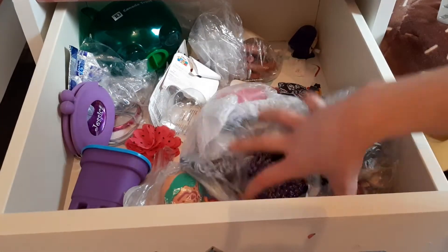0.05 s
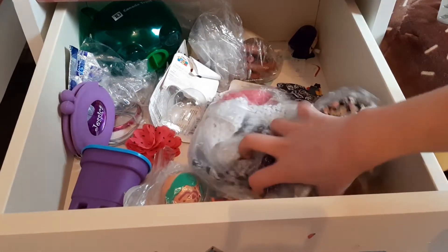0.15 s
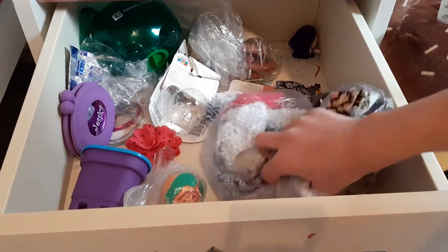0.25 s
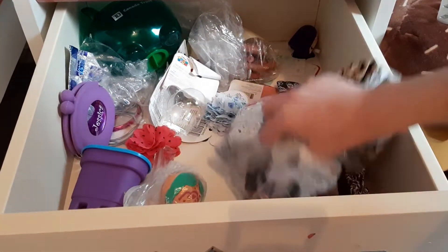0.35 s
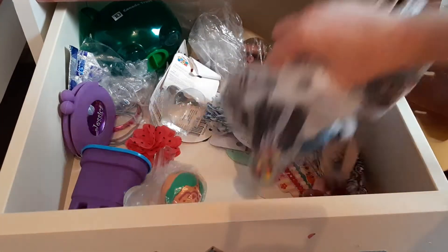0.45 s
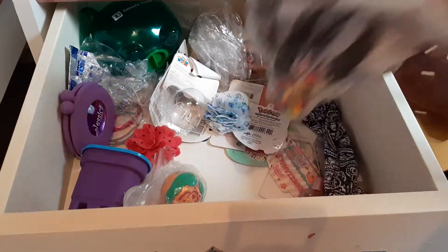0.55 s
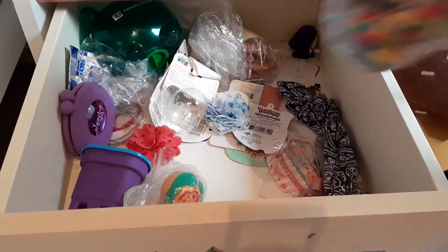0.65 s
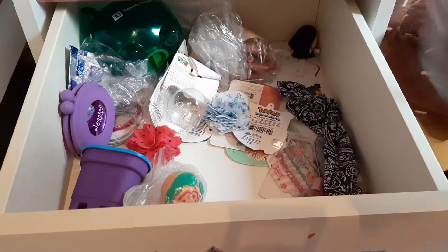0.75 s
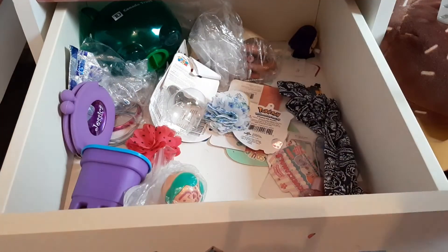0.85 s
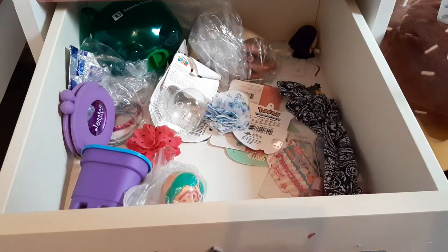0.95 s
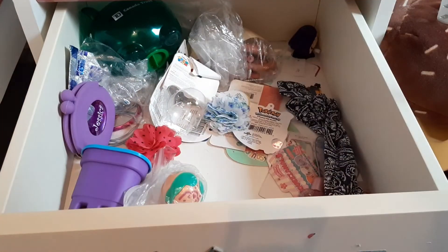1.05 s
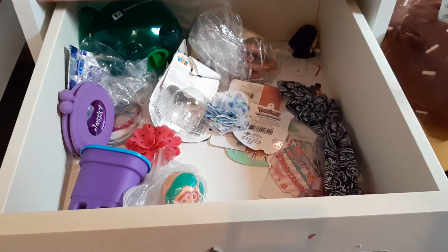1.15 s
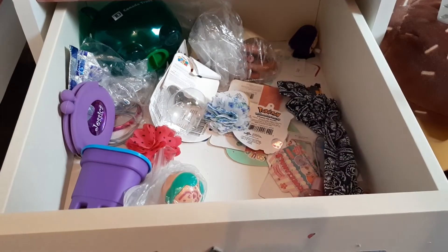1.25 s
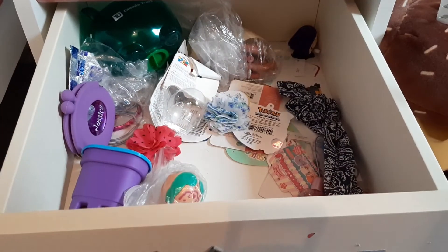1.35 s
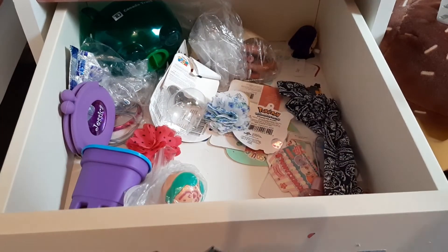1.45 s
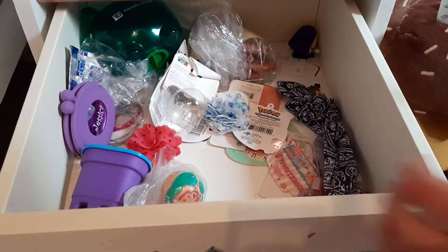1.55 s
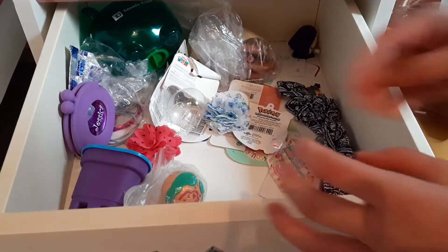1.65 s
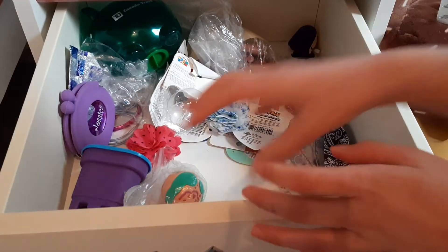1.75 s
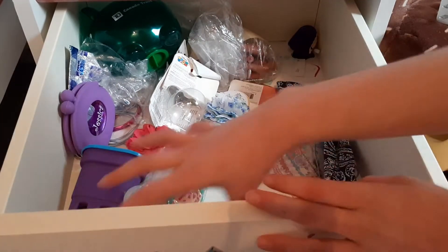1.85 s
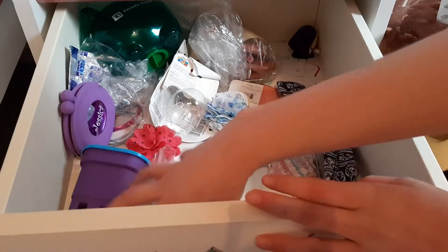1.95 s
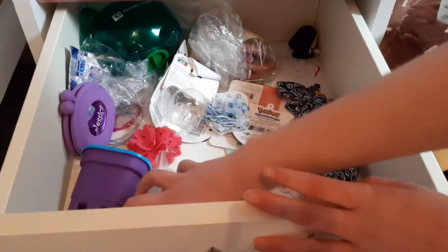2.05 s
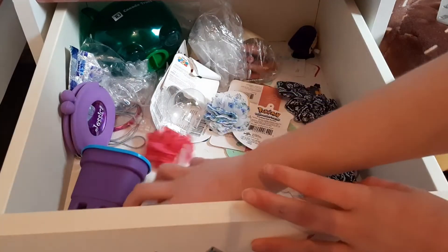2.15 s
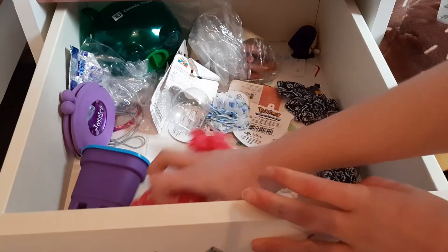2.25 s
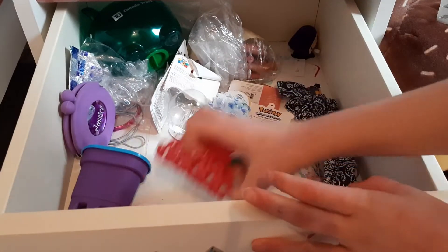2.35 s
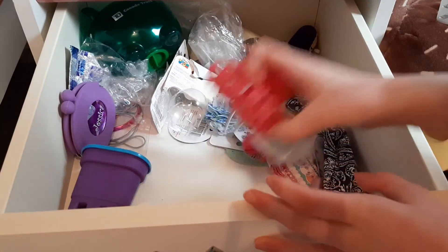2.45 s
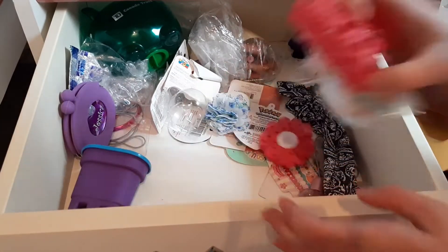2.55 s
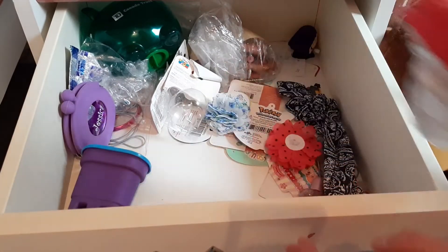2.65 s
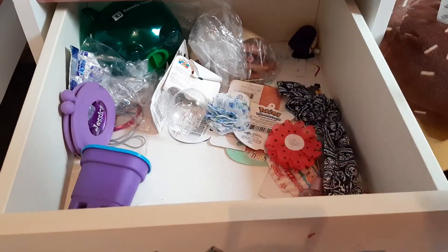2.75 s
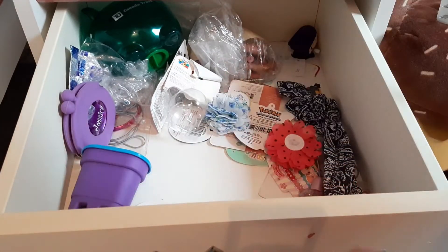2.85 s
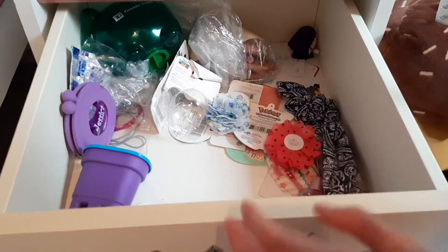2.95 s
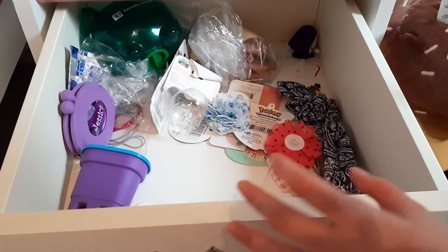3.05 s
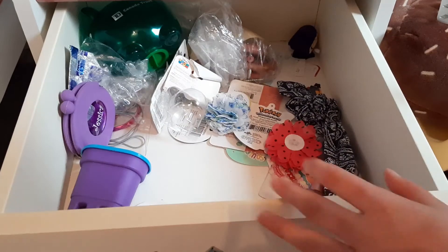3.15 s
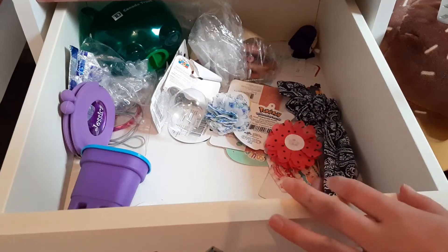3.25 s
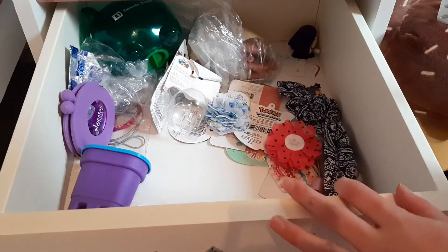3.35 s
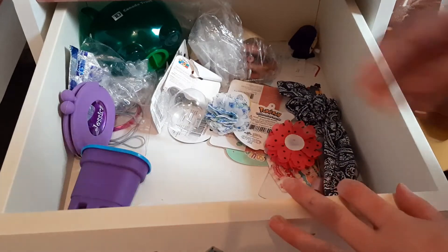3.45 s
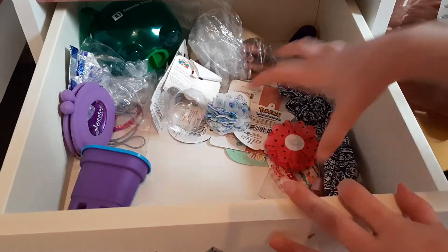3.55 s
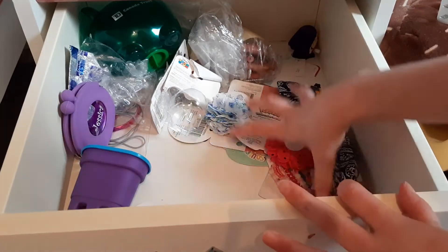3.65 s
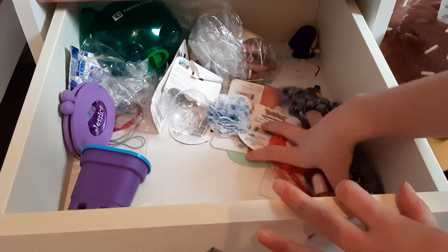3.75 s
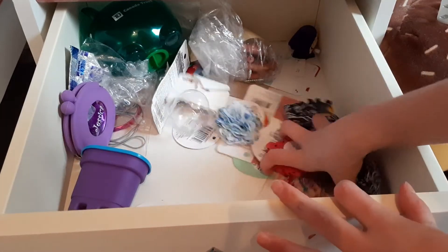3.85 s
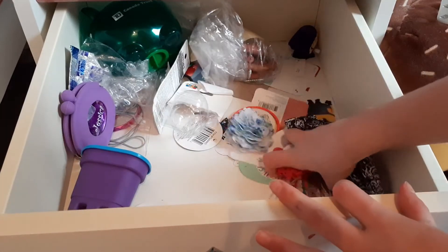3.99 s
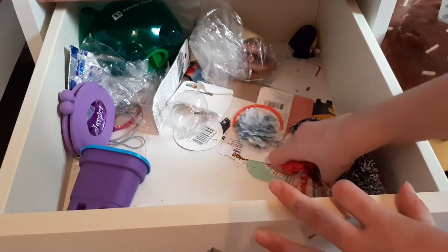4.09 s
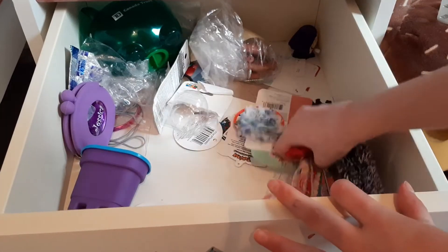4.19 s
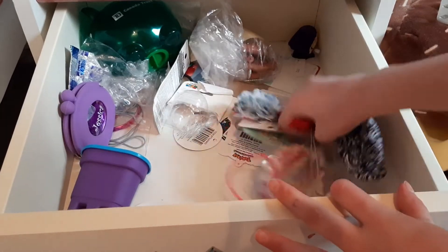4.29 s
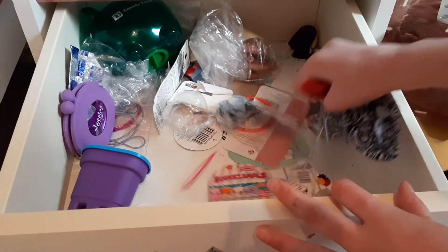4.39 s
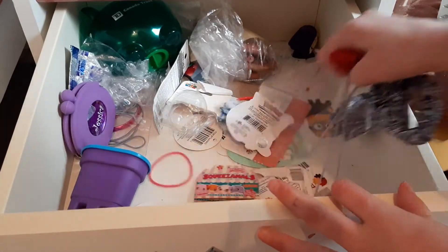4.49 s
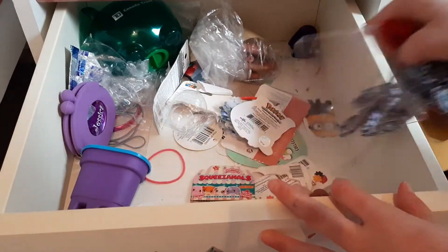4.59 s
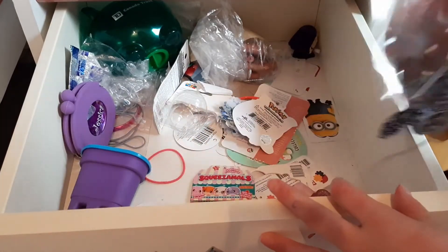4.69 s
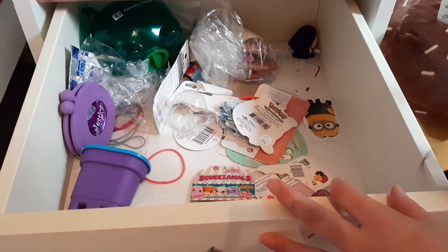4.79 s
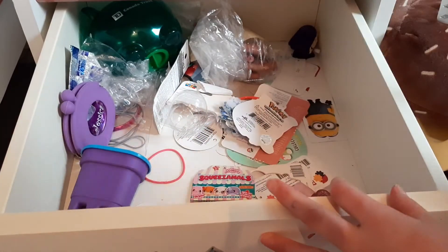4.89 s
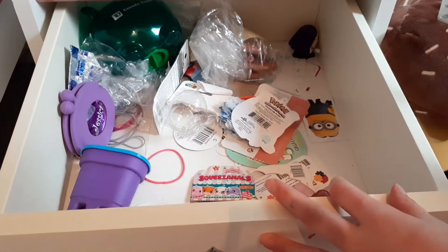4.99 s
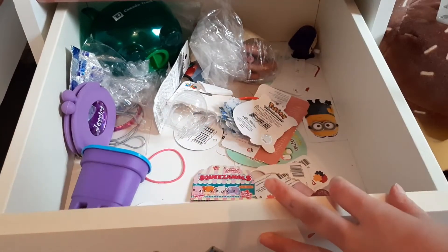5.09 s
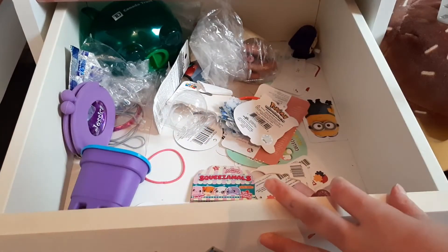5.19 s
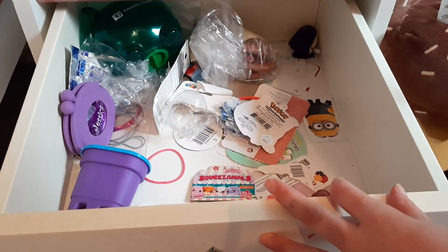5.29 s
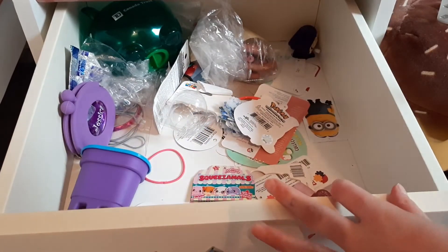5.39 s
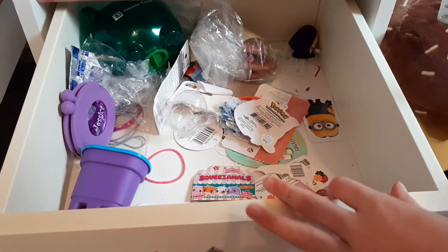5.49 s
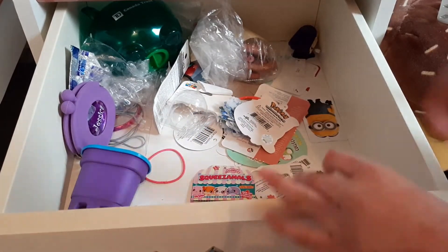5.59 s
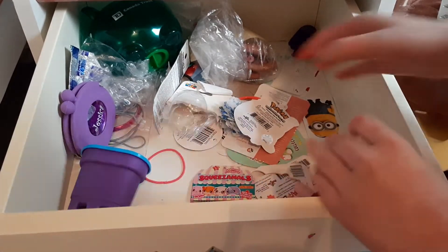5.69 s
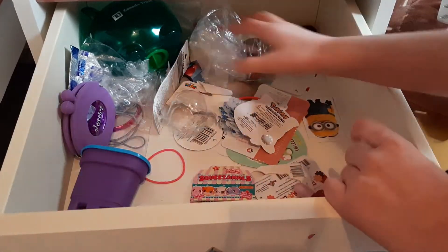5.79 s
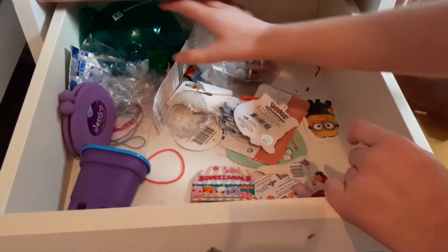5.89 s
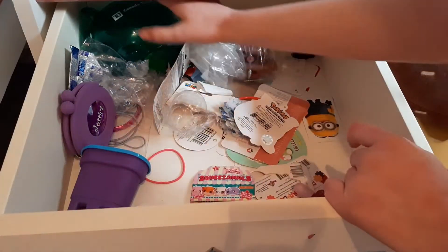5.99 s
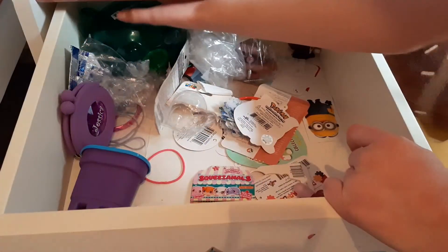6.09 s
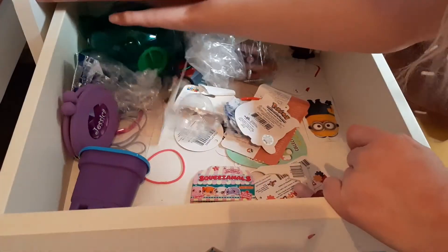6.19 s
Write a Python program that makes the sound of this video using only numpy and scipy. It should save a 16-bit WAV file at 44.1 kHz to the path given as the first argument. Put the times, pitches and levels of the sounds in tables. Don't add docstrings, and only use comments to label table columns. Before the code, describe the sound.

Hands rummage in a wooden drawer, plastic bags crinkling, small hard items clicking and knocking in bursts, then the drawer judders on its runners.

```python
import sys
import numpy as np
from scipy import signal
from scipy.fft import rfft, irfft
from scipy.io import wavfile
from scipy.ndimage import uniform_filter1d, map_coordinates

SR = 44100
rng = np.random.default_rng(int(sys.argv[2]) if len(sys.argv) > 2 else 0)


def to_linear_factor(level_db):
    exponent = np.asarray(level_db, float) / 20
    return 10 ** exponent


def wav_record(signal):
    frames = np.transpose(np.atleast_2d(signal))
    bounded = np.clip(frames, -1, 1)
    quanta = np.round(bounded * 32767).astype(np.int16)
    wavfile.write(sys.argv[1], SR, quanta)


N = 274743

# f/Hz, density/dB
HUSH = [(15, -34.5), (25, -7.5), (80, 3.5), (560, -8), (1840, -17.5), (2050, -13), (3250, -18.5),
        (5140, -7), (7710, -20.5), (8590, -28), (11900, -6.5), (16000, -7)]
HUSH_DB = -76
# f/Hz, share/0-1
LIKENESS = [(30, .8), (80, 0.8), (250, 0.9), (500, .55), (1200, 0.5), (3000, 0)]
GRABS_S = (0.064, 1.998, 3.087, 3.712, 4.702, 5.334)
GRAB_RISE_S = 0.012
# t/s, peak/dB, 20 dB rise/s, 20 dB fall/s
SQUEEZES = [(0.094, -34, .031, .35), (0.198, -32, .08, .1), (0.42, -34, .35, .13), (0.748, -46, .6, .1),
            (0.86, -44, .11, .3), (0.97, -39.5, .2, .13), (1.39, -28, .185, .1), (1.556, -42.5, .3, .33),
            (2.14, -47.5, .25, .3), (2.206, -37.5, .03, .15), (2.436, -52.5, .1, .11),
            (2.68, -63, .02, .22), (3.06, -71, .35, .2), (3.1, -52, .1, .2), (3.168, -37.5, .1, .11),
            (3.33, -67, .1, .22), (3.728, -49.5, .025, .4), (3.85, -48, .12, .3), (3.942, -44, .15, .14),
            (4.054, -42, .04, .07), (4.172, -48, .01, .4), (4.8, -64, .3, .45), (4.413, -34.5, .055, .037),
            (4.489, -37, .05, .095), (4.6, -59, .05, .2), (5.325, -58, .2, .1), (5.345, -37, .01, .14),
            (5.485, -41.5, .04, .6), (5.834, -46.5, .25, .45), (6.23, -43.5, .27, .3)]
# t/s, left minus right/dB, thick film level/dB
BAG_PLACE = [(0.0, -4.5, -15), (0.5, -2.0, -12), (0.87, -11.5, -26), (1.32, -4, -19), (1.86, -9, -9),
             (2.08, -1.5, 1.5), (2.53, -3.5, -2.5), (2.6, -17, -11), (3.07, -6, -1.5), (3.3, -10, -14),
             (3.66, -4, 1), (4.89, -3.5, 0), (5.15, -7, -13), (6.23, -2.5, -0.5)]
# f/Hz, density/dB
FILM = [(300, -37), (800, -12), (1200, -5.5), (2000, -3.5), (3500, -3), (6000, -2), (12000, 0.5),
        (16000, -2)]
# t/s, peak/dB, 20 dB rise/s, 20 dB fall/s, hard edge level/dB
SLIDES = [(0.11, -49, .04, .3, 8), (0.194, -43, .06, .05, -4), (0.46, -51, .5, .053, 6),
          (0.98, -61, .2, .06, -1), (1.39, -36.5, .065, .055, -11), (1.48, -63, .05, .42, 10),
          (1.868, -68, .09, .4, -8), (2.002, -48, .01, .3, -10), (2.058, -41, .1, .25, 0),
          (2.27, -48, .3, .18, 8), (2.42, -46, .013, .1, 9), (2.452, -45, .05, .05, 4),
          (3.164, -43.5, .085, .113, 3), (3.05, -70, .1, .1, -2), (3.8, -37, .07, .33, 2),
          (4.235, -40, .075, .05, 8), (4.33, -28, .012, .075, 5), (4.306, -40, .01, .1, 6),
          (4.37, -37, .05, .26, 3), (4.548, -39, .3, .13, 0), (4.705, -37, .01, .083, -3),
          (4.822, -33, .03, .135, -7), (5.31, -67, .11, .1, 0), (5.345, -54, .03, .8, 5),
          (5.6, -54, .1, .12, 0), (5.82, -57, .15, .15, 3), (4.95, -49, .15, .075, -3),
          (4.44, -42, .1, .1, 5), (6.022, -50, .02, .4, 3)]
# f/Hz, width/Hz, level/dB
PANEL = [(156, 47, -13), (257, 94, -7.5), (335, 50, -1), (415, 55, -4.5), (560, 76, -5), (790, 230, -6.5)]
# f/Hz, width/Hz, level/dB
EDGE = [(1150, 150, -2.5), (1530, 200, 3), (2060, 200, 4), (2500, 200, -4.5), (3600, 1500, -6)]
# t/s, peak/dB, 20 dB rise/s
LEANS = [(0.14, -71, .12), (0.24, -61, .08), (0.81, -60, .07), (1.4, -43, .06), (1.8, -76, .35),
         (2.03, -63, .12), (2.22, -57, .12), (2.45, -66, .08), (3.23, -65.5, .1), (3.76, -48, .07),
         (3.94, -51, .07), (4.08, -50, .05), (4.45, -53, .05), (4.62, -57, .25), (4.87, -60.5, .18),
         (5.36, -71, .17), (5.65, -57, .06), (5.89, -53, .075), (6.21, -46, .13)]
LEAN_FALL_PER_RISE = 1.15
# t/s, peak/dB, f/Hz, t60/s
BUMPS = [(0.187, -29.5, 328, 0.083), (1.867, -43, 262, 0.061), (1.916, -51.5, 594, 0.094),
         (2.0, -35.5, 570, 0.074), (2.029, -33.5, 374, 0.1), (2.045, -26.5, 362, 0.09),
         (2.087, -28.5, 390, 0.077), (2.103, -30, 400, .07), (2.129, -34, 290, 0.07),
         (2.176, -32, 330, 0.07), (2.19, -33, 340, .07), (2.224, -28.5, 351, 0.06), (2.268, -40, 300, .07),
         (2.298, -38, 350, .06), (2.327, -43, 320, 0.06), (2.343, -43, 350, .06), (2.362, -44, 380, .08),
         (2.439, -46, 574, 0.13), (3.732, -37, 149, 0.12), (3.745, -31, 337, 0.1), (3.787, -32, 370, .08),
         (3.818, -31, 400, .06), (3.849, -30, 580, 0.11), (3.915, -26, 390, 0.15),
         (4.057, -28.5, 362, 0.13), (4.325, -15, 369.5, 0.1), (4.343, -26, 480, .07), (4.41, -27, 350, .07),
         (4.465, -27, 350, .06), (4.483, -24, 334, 0.054), (4.512, -22, 409, 0.096),
         (4.554, -18, 366, 0.069), (4.635, -35.5, 285, 0.12), (4.705, -14.5, 317, 0.064),
         (4.817, -17, 335, 0.12), (5.873, -39.5, 149, 0.065), (5.873, -44, 300, .06),
         (6.024, -45, 600, .06), (6.078, -43, 740, .08), (6.024, -30.5, 283, 0.052),
         (6.054, -36.5, 275, 0.081), (6.103, -36.5, 245, 0.033), (6.128, -32, 393, 0.1)]
# t/s, peak/dB, f/Hz, t60/s
TAPS = [(0.188, -26.5, 2080, 0.052), (2.0004, -51, 912, 0.039), (2.0298, -33.5, 1210, 0.042),
        (2.0417, -27.5, 1510, 0.099), (2.2054, -31.5, 946, 0.065), (2.378, -50, 1760, 0.05),
        (2.4182, -24, 1900, 0.021), (2.441, -29, 1485, 0.046), (3.0879, -39.5, 2050, 0.059),
        (3.766, -18.5, 2210, 0.031), (3.7846, -26, 1890, 0.035), (3.819, -29, 1900, 0.05),
        (3.8686, -31, 1920, 0.035), (3.9135, -23, 2040, 0.045), (3.9335, -21.5, 2520, 0.03),
        (3.9527, -24, 2140, 0.032), (4.06, -28.5, 1135, 0.078), (4.1635, -38.5, 1510, 0.05),
        (4.2337, -30, 1530, 0.037), (4.3035, -25, 2035, 0.067), (4.3263, -14.5, 2070, 0.045),
        (4.3534, -25.5, 2030, 0.058), (4.3828, -26, 1496, 0.041), (4.4697, -24, 2050, 0.05),
        (4.5073, -20.5, 1290, 0.019), (4.5544, -25, 1123, 0.059), (4.7039, -26, 1170, 0.096),
        (4.8185, -19.5, 1150, 0.045), (5.3368, -31, 2190, 0.049)]
# t/s,
# peak/dB, f/Hz, t60/s
RINGS = [(2.18, -38, 1750, .04), (2.245, -38, 1150, .04), (2.4182, -27, 2650, .025),
         (2.4182, -27, 1550, .03), (2.441, -32, 2050, .04), (2.677, -60, 3520, .05),
         (2.677, -60, 4150, .05), (2.745, -64, 4150, .12), (2.75, -67, 3500, .1), (2.395, -45, 3600, .03),
         (5.143, -66, 4800, .03), (3.7235, -38, 4880, .02), (3.7335, -33, 3960, .025),
         (3.7655, -21, 1500, .05), (3.7846, -30, 2650, .03), (3.9145, -19, 1150, .05),
         (3.9135, -28, 3150, .025), (3.9335, -26, 3500, .025), (3.9335, -28, 5050, .025),
         (3.9335, -27, 2100, .05), (4.304, -28, 3500, .025), (4.304, -29, 1400, .05),
         (4.328, -19, 1520, .05), (4.3263, -22, 1150, .05), (4.3534, -27, 1500, .04),
         (4.4067, -28, 1330, .04), (4.422, -31, 2000, .05), (4.444, -31, 1500, .03),
         (4.5073, -27, 1900, .025), (4.538, -34, 3500, .025)]
RING_S = 0.3
PORTS_HZ = 1770
# t/s, peak/dB
SQUEAKS = [
    (0.5746, -52.5),
    (0.5894, -49.5),
    (2.6773, -58),
    (2.7447, -68.5),
    (3.0874, -53),
    (5.1422, -76),
]
# f/Hz, level/dB, t60/s
WRAPPER = [(2060, 3, 0.05), (2840, -13, .05), (3500, -14, 0.066), (4000, -10, 0.04), (5100, -13, 0.057),
           (7060, -10, 0.034)]
# t/s, peak/dB, dull share/dB
SNAPS = [(2.0014, -39.5, 3), (2.0393, -24.5, -13), (2.0802, -25, -35), (2.1754, -32.5, 3.5),
         (2.205, -28, -8), (2.2129, -18.5, -12.5), (2.395, -33.5, -4), (2.4368, -32.5, -0.5),
         (2.678, -45, -4.5), (2.7423, -57, -4), (2.8556, -56, -3), (3.064, -46, -8), (3.0888, -27.5, -3.5),
         (3.141, -26, -18), (3.3997, -55, -15.5), (3.4326, -53.5, -6.5), (3.715, -38, -10.5),
         (3.7323, -21.5, -13.5), (4.4054, -18, -17.5), (4.1634, -24, -12), (5.1138, -54, 2),
         (5.219, -48, -30), (5.3363, -10, -34), (5.4781, -15.5, -8), (5.6762, -28, -20), (5.8287, -31, -17),
         (5.98, -29, -15), (6.111, -29, -11), (6.1913, -31, -7), (0.831, -36, -5), (3.7235, -32, 0),
         (4.2925, -30, -3), (4.464, -26, -3), (4.647, -36, -12), (4.866, -36, -8), (5.0091, -48, -3)]
# start/s, end/s
WRAPPED_S = (3.75, 4.52)
WRAP_DB, WRAP_DULL_DB = -0.3, -11
BOUNCE_DB, BOUNCE_DULL_DB = -15, 0
# t/s, peak/dB
BOUNCES = [
    (4.714, -22),
    (4.7565, -22),
    (4.789, -29),
    (4.819, -30.5),
    (4.861, -26),
    (4.887, -31),
    (4.907, -33),
    (4.934, -36),
    (4.964, -39),
    (5.009, -49),
]
# f/Hz, level/dB, t60/s
HOLLOW = [(327, -1, 0.1), (575, -5, 0.15), (745, -5, .1), (908, 1, 0.082), (1134, 1.5, 0.1),
          (1290, -4, 0.07), (1414, 1, 0.06), (1495, -9.5, .1), (1817, -9, .06), (2040, -12, .05),
          (2810, -6, 0.016), (3750, -18, .03), (5000, -16, .02)]
# t/s, level/dB, jerk rate/Hz
NUDGE = [
    (6.13, -35, 153),
    (6.183, -26, 152.5),
    (6.23, -30, 150.5),
]
# f/Hz, width/Hz, level/dB
FRAME = [(150, 51, 5), (290, 120, -6), (450, 80, -1), (577, 73, -12), (830, 66, -13), (1260, 60, -18),
         (1480, 80, -24), (2040, 300, -14), (3200, 1200, -24)]
ROOM_T60_S, ROOM_DB = 0.18, -5
LEFT_LATE_SAMPLES = 5
# f/Hz, gain/dB
MIC = [(7000, 1.04), (8250, 0.4), (8500, -7.5), (8950, -5), (9300, -4.5), (10800, -0.5), (15650, 4),
       (15900, -35), (18000, -45)]


def curve(table):
    s, *columns = np.transpose(table)
    s = np.maximum.accumulate(s)
    return [np.interp(np.arange(N) / SR, s, c) for c in columns]


def unit(x):
    return x / np.sqrt(np.mean(x ** 2))


def on_log(points):
    hz, value = np.transpose(points)
    return np.interp(np.log(np.fft.rfftfreq(N, 1 / SR) + 1), np.log(hz), value)


def colour(x, points):
    return unit(irfft(rfft(x) * to_linear_factor(on_log(points)), N))


def band(x, lo_hz, hi_hz):
    return signal.sosfilt(signal.butter(2, [lo_hz, hi_hz], "band", fs=SR, output="sos"), x)


def resonate(x, peaks):
    total = 0
    for k, (hz, width_hz, db) in enumerate(peaks):
        b, a = signal.iirpeak(hz, hz / width_hz, SR)
        total = total + (-1) ** k * to_linear_factor(db) * signal.lfilter(b, a, x)
    return unit(total)


def ports(x):
    like = np.clip(on_log(LIKENESS), 0, 1)
    a, b = rfft(x)
    mid, side = a * np.sqrt(1 + like), b * np.sqrt(1 - like)
    return irfft(np.array([mid + side, mid - side]) / 2, N)


def panned(db, pan_db):
    return to_linear_factor(db + np.array([[0.5], [-0.5]]) * pan_db)


def add(out, s, x):
    i = int(s * SR)
    out[:, i:i + x.shape[1]] += x[:, :N - i]


def hush():
    noise = ports(rng.standard_normal((2, N)))
    return to_linear_factor(HUSH_DB) * colour(noise, HUSH) * panned(0.33, -9.0)


def clicks(per_s, scatter_db, t60_s):
    when, size = rng.random(N), rng.exponential(1, N)
    power = (when < per_s / SR) * to_linear_factor(2 * scatter_db * np.minimum(size, 4))
    power = signal.lfilter([1], [1, -1000 ** (-2 / (t60_s * SR))], power)
    return np.sqrt(power) * rng.standard_normal((2, N))


def swells(s, db, rise_s, fall_s):
    t, grabs = np.arange(0, N + 16, 16) / SR, np.array(GRABS_S)
    late = t - s[:, None]
    grab = grabs[np.searchsorted(grabs, s) - 1, None]
    slope = np.where(late < 0, late / rise_s[:, None], -late / fall_s[:, None])
    slope = slope + np.minimum(t - grab, 0) / GRAB_RISE_S
    power = np.sum(10 ** (db[:, None] / 10 + 2 * slope), axis=0)
    return np.interp(np.arange(N) / SR, t, 10 * np.log10(power + 1e-30))


def patchy(x, patchy_db, hz, s):
    f, t, z = signal.stft(x, SR, nperseg=512)
    field = rng.standard_normal((64, 256))
    where = np.meshgrid(f / hz, t / s, indexing="ij")
    walk = map_coordinates(field, where, order=1, mode="mirror")
    return unit(signal.istft(z * to_linear_factor(patchy_db * walk), SR, nperseg=512)[1][:, :N])


def bags():
    db = swells(*np.transpose(SQUEEZES))
    pan_db, thick_db = curve(BAG_PLACE)
    thin = colour(clicks(2200, scatter_db=1.5, t60_s=0.031), FILM)
    thin = patchy(thin, patchy_db=2.5, hz=900, s=0.05)
    thick = colour(ports(clicks(2000, scatter_db=3.5, t60_s=0.022)), FILM)
    thick = unit(band(thick, 730, 6200))
    return panned(db + 0.54, pan_db) * (thin + to_linear_factor(thick_db) * thick)


def drag():
    s, db, rise_s, fall_s, edge_db = np.transpose(SLIDES)
    panel = resonate(ports(clicks(300, scatter_db=1.0, t60_s=0.061)), PANEL)
    edge = resonate(ports(clicks(700, scatter_db=3.2, t60_s=0.014)), EDGE)
    panel = panned(swells(s, db, rise_s, fall_s) - 3.76, -7.5) * panel
    edge = panned(swells(s, db + edge_db, rise_s, fall_s) - 8.5, 0.066) * edge
    moving = np.arange(N) / SR < NUDGE[0][0]
    return moving * (panel + edge)


def weight():
    s, db, rise_s = np.transpose(LEANS)
    rumble = unit(band(ports(rng.standard_normal((2, N))), 55, 165))
    return panned(swells(s, db, rise_s, LEAN_FALL_PER_RISE * rise_s), -3.0) * rumble


def ring(hz, t60_s, luck, push_s):
    t = np.arange(int(RING_S * SR)) / SR
    phase = np.pi * luck * min(hz / PORTS_HZ, 1) * np.array([[1], [-1]])
    return np.sin(2 * np.pi * hz * t + phase) * 1000 ** (-t / t60_s) * np.minimum(t / push_s, 1)


def knocks(table, width_oct, near_db, push_s, crack_db, pan_db):
    out, chance = np.zeros((2, N)), rng.uniform(-1, 1, (len(table), 6, 2))
    t = np.arange(int(RING_S * SR)) / SR
    noise = rng.standard_normal((len(table), 2, len(t)))
    for (s, db, hz, t60_s), draw, hiss in zip(table, chance, noise):
        x = ring(hz, t60_s, draw[0, 1], push_s)
        for shift, luck in draw[1:]:
            x = x + to_linear_factor(near_db) * ring(hz * 2 ** (width_oct * shift), 0.65 * t60_s, luck, push_s)
        like = 1 - min(hz / PORTS_HZ, 1)
        fade = 1000 ** (-t / (1.54 * t60_s)) + 0.89 * 1000 ** (-t / (0.18 * t60_s))
        crack = unit(band(hiss + like * hiss[::-1], 0.29 * hz, 1.63 * hz))
        crack = crack * fade * np.minimum(t / push_s, 1)
        add(out, s, panned(db - 5.5, pan_db) * (x + to_linear_factor(crack_db) * crack))
    return out


def bumps():
    return knocks(BUMPS, width_oct=0.22, near_db=-7.5, push_s=0.0049, crack_db=-8, pan_db=-3.5)


def taps():
    main = knocks(TAPS, width_oct=0.5, near_db=-12, push_s=0.00021, crack_db=-5, pan_db=-1.5)
    further = knocks(RINGS, width_oct=0.15, near_db=-12, push_s=0.0004, crack_db=-14, pan_db=-2.5)
    return main + further


def struck(blows, modes, scatter_db, push_s, pan_db):
    out, chance = np.zeros((2, N)), rng.uniform(-1.04, 1, (len(blows), len(modes), 2))
    for (s, db), draw in zip(blows, chance):
        for (hz, mode_db, t60_s), (mix, luck) in zip(modes, draw):
            gain = panned(db + mode_db + scatter_db * mix, pan_db)
            add(out, s, gain * ring(hz * (1 + 0.02 * luck), t60_s, 0.7 * luck, push_s))
    return out


def wrapper():
    return to_linear_factor(3.0) * struck(SQUEAKS, WRAPPER, scatter_db=0.5, push_s=0.003, pan_db=-3.0)


def snaps():
    out, t, pan_db = np.zeros((2, N)), np.arange(2048) / SR, curve(BAG_PLACE)[0]
    start_s, end_s = WRAPPED_S
    rows = SNAPS + [(s, db + WRAP_DB, WRAP_DULL_DB) for s, db, _, _ in TAPS if start_s < s < end_s]
    rows += [(s, db + BOUNCE_DB, BOUNCE_DULL_DB) for s, db in BOUNCES]
    noise = rng.standard_normal((len(rows), 2, len(t)))
    shape = 0.77 * 1000 ** (-t / 0.004) + 1000 ** (-t / 0.028) + to_linear_factor(-26) * 1000 ** (-t / 0.071)
    for (s, db, dull_db), hiss in zip(rows, noise):
        sharp, dull = unit(band(hiss, 6500, 13000)), unit(band(hiss, 3000, 7500))
        crack = sharp + to_linear_factor(dull_db + 4.5) * dull
        add(out, s, panned(db - 12.5, pan_db[int(s * SR)]) * shape * crack)
    return out


def hollow_piece():
    return to_linear_factor(-7.5) * struck(BOUNCES, HOLLOW, scatter_db=2.5, push_s=0.0006, pan_db=-0.5)


def nudge():
    db, hz = curve(NUDGE)
    wobble = uniform_filter1d(rng.standard_normal((2, N)), size=300) * np.sqrt(300)
    cycle = np.cumsum(hz * (1 + 0.058 * wobble[0])) / SR
    jerks = np.diff(np.floor(cycle), prepend=0) * to_linear_factor(3.8 * wobble[1])
    grit = ports(clicks(300, scatter_db=-3, t60_s=0.031))
    frame = resonate(unit(jerks) + to_linear_factor(-1) * unit(grit), FRAME)
    moving = np.arange(N) / SR > NUDGE[0][0]
    return moving * panned(db + 0.21, -3.0) * frame


def room(near):
    t = np.arange(int(ROOM_T60_S * SR)) / SR
    smear = rng.standard_normal((2, len(t))) * 1000 ** (-t / ROOM_T60_S)
    tail = signal.fftconvolve(near.mean(axis=0)[None], smear, axes=1)[:, :N]
    return to_linear_factor(ROOM_DB) * ports(tail) / np.sqrt(ROOM_T60_S * SR / 14)


def scene():
    near = bags() + drag() + bumps() + taps() + wrapper() + snaps() + hollow_piece() + nudge()
    near = band(near, 100, 19000)
    near[0] = np.pad(near[0], (LEFT_LATE_SAMPLES, 0))[:N]
    return near + room(near) + weight() + hush()


def band_limit(x):
    return signal.sosfilt(signal.butter(12, 16200, fs=SR, output="sos"), x)


def record(dry):
    mix = irfft(rfft(dry) * to_linear_factor(on_log(MIC)), N)
    return band_limit(mix)


dry = scene()
out = record(dry)
wav_record(out)
```